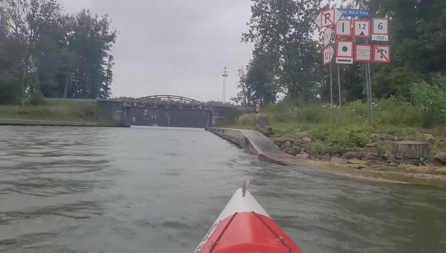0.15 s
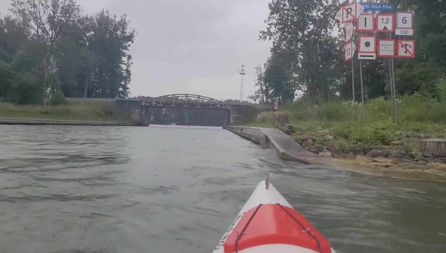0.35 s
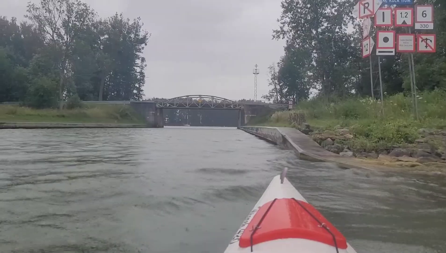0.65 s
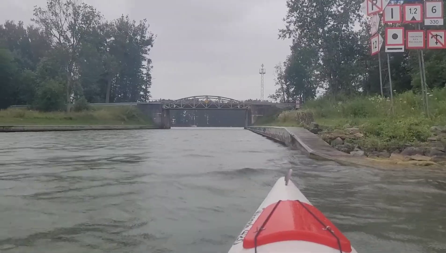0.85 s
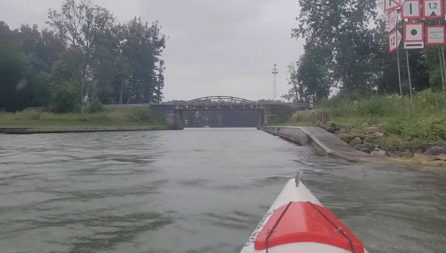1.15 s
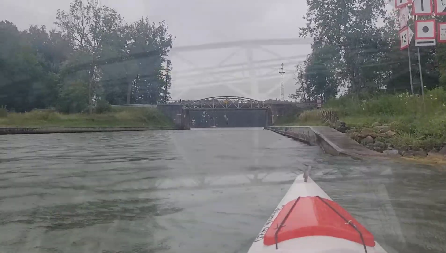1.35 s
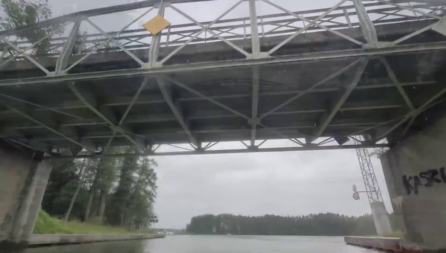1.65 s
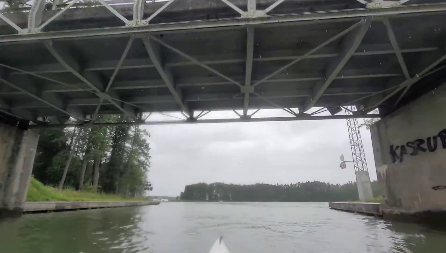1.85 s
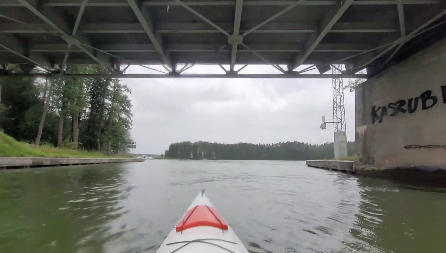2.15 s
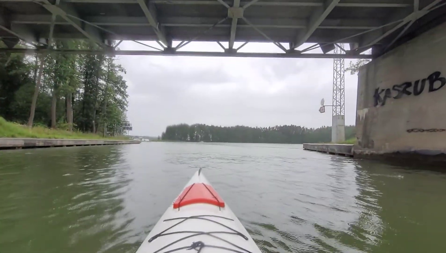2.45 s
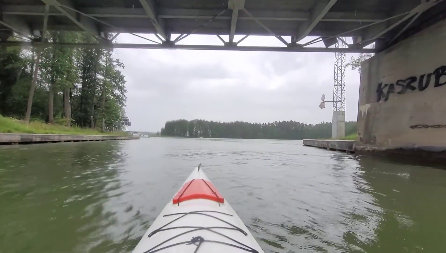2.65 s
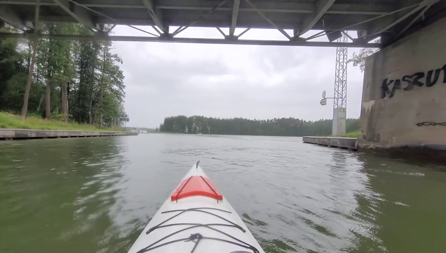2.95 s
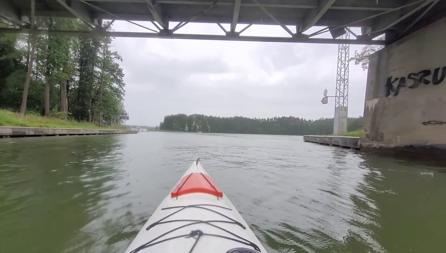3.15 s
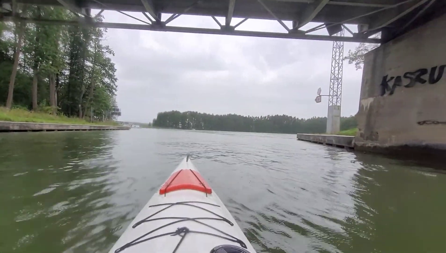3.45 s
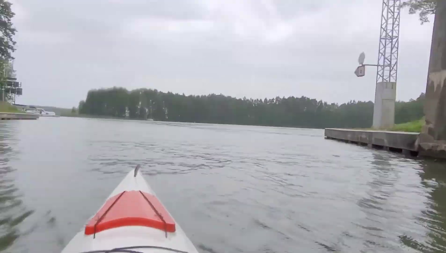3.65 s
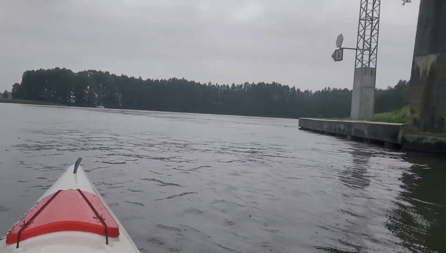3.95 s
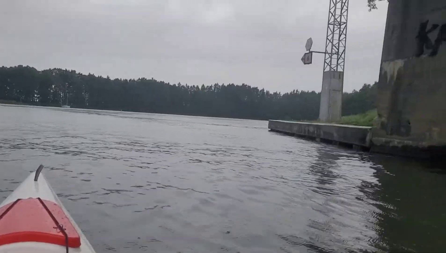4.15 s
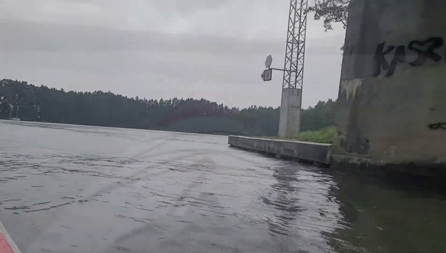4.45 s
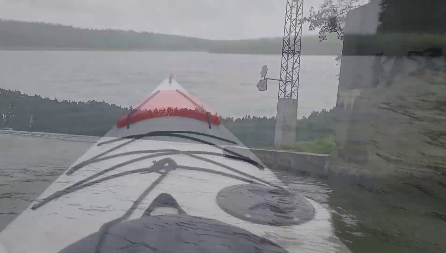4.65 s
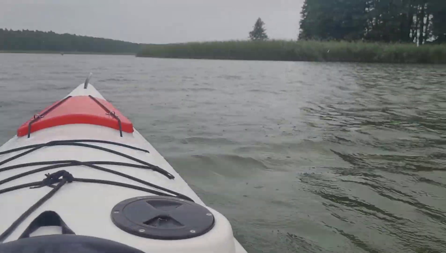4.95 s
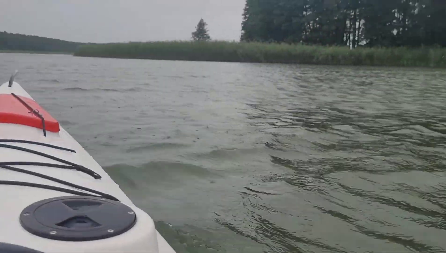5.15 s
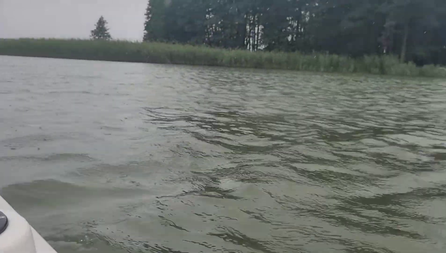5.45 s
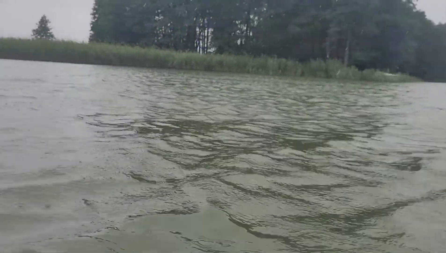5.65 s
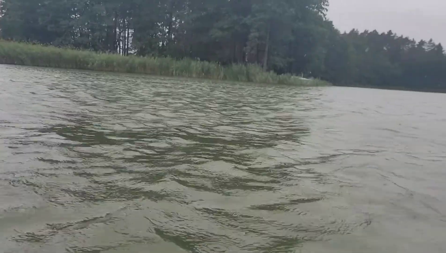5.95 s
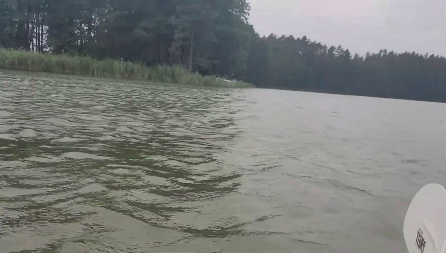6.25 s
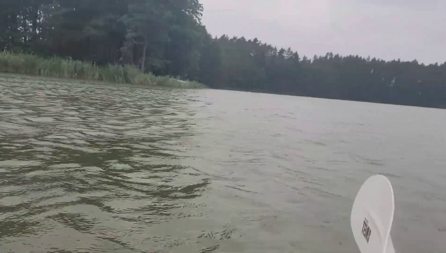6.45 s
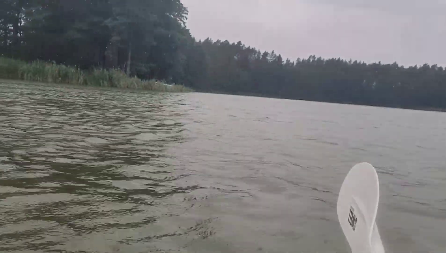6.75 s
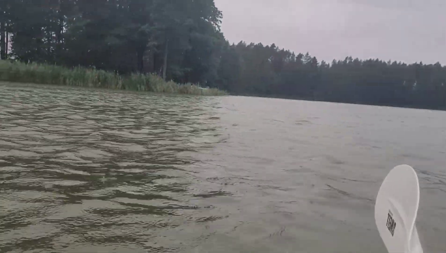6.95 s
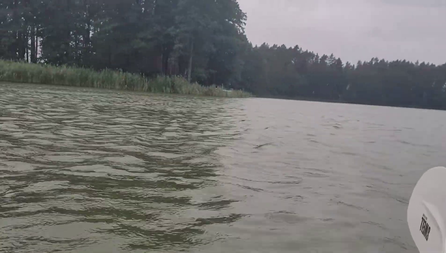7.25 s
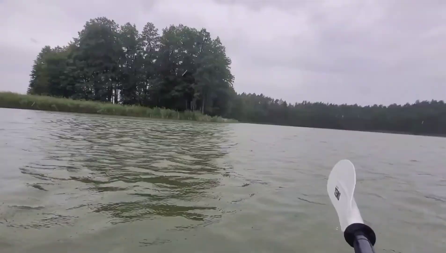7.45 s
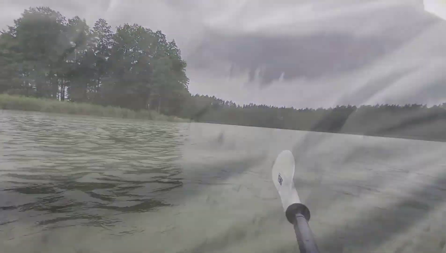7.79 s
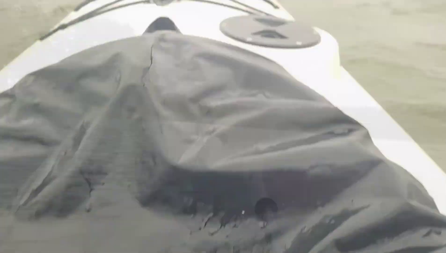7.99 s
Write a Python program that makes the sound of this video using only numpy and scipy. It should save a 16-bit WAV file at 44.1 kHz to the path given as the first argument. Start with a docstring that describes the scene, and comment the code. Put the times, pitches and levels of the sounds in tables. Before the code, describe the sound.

Rain patters and taps on a kayak over soft water hiss, with heavy low thumps near the microphone and a brief dropout late.

```python
"""Rain on a kayak

Rain falls on a kayak on a lake, heard by a small two-port microphone on board. Shaped noise makes the soft
wash; noise bursts ringing broad resonances make the patter, the near drops and the slaps on a hollow panel.
Large drops thump the ports as sliding, fading swings; wet cloth rustles as crackling noise, and trapped air
gurgles as noise ringing on a sliding pitch. Near 7.3 s all of it sinks almost to silence, then returns."""
import sys
import numpy as np
from scipy import signal
from scipy.fft import rfft, irfft
from scipy.io import wavfile
from scipy.ndimage import uniform_filter1d

SR = 44100
rng = np.random.default_rng(int(sys.argv[2]) if len(sys.argv) > 2 else 0)


def output_pcm(signal):
    """Save a mono or channel-first signal as 16-bit PCM at the path in sys.argv[1].

    Samples are clipped to [-1, 1] before scaling.
    """
    pcm = np.clip(np.atleast_2d(signal).T, -1, 1) * 32767
    wavfile.write(sys.argv[1], SR, np.round(pcm).astype(np.int16))


N = 358091  # length in samples

# Levels below are those before the overall gain and the microphone; sides are left over right.
# Wash of far rain and lake: (t/s, level/dB, rumble/dB, fizz/dB)
WASH_LEVELS = [(0.0, -52.5, -57, -60.5), (0.361, -50.5, -56.5, -57.5), (0.7, -44, -47, -52.5),
               (1.1, -44.5, -46.5, -54), (1.3, -53, -49, -62), (1.45, -59.5, -55, -66.5),
               (1.58, -65, -66, -72), (1.72, -58.5, -60, -68.5), (2.0, -55, -61, -60),
               (2.3, -56.5, -62, -61), (2.55, -50.5, -59.5, -54.5), (3.0, -55, -63, -58),
               (3.3, -51.5, -44.5, -56), (3.55, -63, -63.5, -63.5), (3.85, -55, -66, -58),
               (4.07, -59.5, -65, -64), (4.5, -53.5, -72, -59), (5.1, -58.5, -58.5, -63.5),
               (5.45, -50.5, -55.5, -59.5), (5.75, -50.5, -61, -59), (6.0, -56, -58.5, -58),
               (6.7, -56.5, -53.5, -60), (7.06, -52.5, -50, -62.5), (7.2, -53.5, -36, -67.5),
               (7.749, -64.5, -53.5, -64), (8.12, -65, -56, -68.5)]
# Resting colour of the wash, of which only the shape counts: (f/Hz, level/dB per Hz)
WASH_COLOUR = [(18, -59), (35, -18.5), (60, -9.5), (175, -10.5), (250, -5), (400, -12.5), (635, -10),
               (1120, -9), (2500, -18.5), (4860, -27), (6670, -36.5), (8670, -50.5), (12000, -45.5)]
# How alike the wash is at the two ports: (f/Hz, likeness 0-1)
PORT_LIKENESS = [(60, 0.14), (280, 0.51), (700, 0.57), (2800, 0.28), (6000, 0.4)]
# Parts of the wash, in the order level, rumble, fizz, hum: (lowest f/Hz, highest f/Hz)
WASH_BANDS = [(500, 2000), (40, 130), (2200, 6500), (150, 450)]
# Near drops: (t/s, peak/dB before the sides are shared, knock over snap/dB, tap over snap/dB, side/dB)
NEAR_DROPS = [(0.361, -33, 3, 9, 2.5), (0.532, -30.5, 13, 15, -5), (0.863, -19, 11.5, -5, -3),
              (0.981, -21.5, 28, 9, -13), (1.031, -18.5, 13, -8, 3.5), (1.238, -12, 6, 2, 9.5),
              (1.253, -23, 6, 0.5, -24), (1.321, -21.5, 17, 14.5, -6.5), (1.743, -36, -7, 2, -1),
              (1.83, -27, 24.5, 14.5, -17), (1.847, -8.5, 21.5, 17, -17), (1.873, -36.5, 39.5, 32, -8.5),
              (1.88, -27, 41, 24, -14), (1.965, -20, -10.5, -5, -3), (1.993, -27.5, 18, 13, -16),
              (2.034, -26, 14.5, 18.5, -17), (2.05, -20, 16.5, 16, -12), (2.049, -16.5, 22, 10, -17.5),
              (2.069, -27.5, 2.5, 10.5, -9.5), (2.122, -34.5, -5, 4, 4), (2.346, -31, 9, 4, 2),
              (2.437, -28, -6, -6, -2), (2.495, -36, -3.5, 19, -1), (2.544, -15.5, -5.5, 8, 2),
              (2.666, -24.5, 9, 16, -5), (2.914, -20, -5.5, -4.5, -9), (3.046, -33, 0, 15, -2),
              (3.172, -25, 6, 5, -2), (3.206, -25.5, 7, 4, 5), (3.316, -10, 9, 4, -3),
              (3.4, -30.5, -13, -12, -6), (3.414, -27.5, -15, -5, -5), (3.477, -25, -22, -10, -4),
              (3.491, -18, 2.5, -8, 8.5), (3.583, -34, -12, -5, 1), (3.873, -35, -24, -6, -2.5),
              (3.921, -27, -7, 2, 3), (4.169, -32, 11.5, 10.5, 3), (4.251, -30.5, 20, 17.5, -10),
              (4.449, -32, 24, 18, -16), (4.483, -31, 16, 15.5, -10), (4.58, -32.5, -15, -8, 16),
              (4.626, -22.5, -4.5, -6, 24), (4.649, -32, -21, -6, 19), (4.836, -21, -26, -17, 21),
              (4.906, -17.5, -12, -10.5, 11), (5.054, -11.5, -12.5, -16.5, 19.5), (5.128, -32, -7, -9, 11),
              (5.191, -32.5, -7, 1, 12), (5.218, -32.5, 6, -10, 21), (5.262, -18.5, -8.5, -19, 27),
              (5.298, -26.5, -6, -10, 27), (5.328, -25, -7, 1, 24), (5.353, -21.5, -16, -11, 32),
              (5.408, -29.5, -15.5, -7, 23), (5.435, -19.5, -8.5, -10, 20), (5.48, -13, -7.5, -5.5, 15),
              (5.592, -28, -5, -16, 20), (5.668, -15.5, -18, -10.5, 17), (5.727, -33, 0, 16, -18),
              (5.779, -21, -2, -21, 24.5), (5.818, -7, -1, -0.5, 24.5), (5.85, -9.5, -9.5, -15, 22),
              (5.901, -26.5, -17, -17, 29), (5.916, -21.5, -2.5, -17, 29), (5.945, -25, -10, -15, 27),
              (6.038, -24.5, -18, -19, 33), (6.086, -23.5, -10.5, -10.5, 30),
              (6.166, -23.5, -18.5, -17, 27), (6.213, -13, -0.5, -9, 37), (6.25, -32, -13, -13, 25),
              (6.265, -26, -11.5, -18, 24.5), (6.284, -29.5, 3, 4, 10), (6.301, -30, -11, -13, 24),
              (6.315, -20.5, -13, -22, 38), (6.358, -16, -23, -34, 35), (6.399, -31, 1, -1, 14),
              (6.423, -30, -11, -9, 25), (6.463, -23, 2, -6, 27), (6.487, -17, -4.5, -23, 28),
              (6.561, -24.5, -20, -26, 30), (6.631, -32.5, -7, -11, 17.5), (6.711, -34.5, -11, -21, 21),
              (6.752, -29.5, -22, -23, 29), (6.779, -25, 10, 10.5, 21), (6.806, -22, -3.5, -11, 25),
              (6.97, -32.5, -7, -23, 21), (7.048, -29, -1, 20, 5), (7.082, -21, 33, 12, -5.5),
              (7.111, -26, 6.5, 4.5, 15), (7.125, -13.5, 6, 9.5, -27), (7.148, -27, 8.5, 4.5, 13),
              (7.201, -11, 16, 14, -11.5), (7.637, -35, 15, 6.5, -28)]
# What a near drop rings, in the groups knock, tap, snap: (f/Hz, width of one resonance/Hz, level/dB)
DROP_BODY = [
    [(285, 170, 4.5), (430, 460, 8.5), (684, 430, -3)],
    [(1150, 900, 7), (2090, 1050, 3)],
    [(2800, 2300, 2.5), (4770, 1400, -2.5), (5460, 6200, -25.5), (8260, 9000, -17)],
]
# Big drops slapping a hollow panel:
# (t/s, peak/dB before the sides are shared, knock over snap/dB, tap over snap/dB, side/dB, burst decay/s)
PANEL_SLAPS = [(6.669, -9.5, 2, 10.1, -23.5, 0.002), (7.664, -18, 11.5, 11.3, -21, 0.0071),
               (7.687, -12, 23.5, 17.2, -22, 0.0072), (7.712, -13, 23, 17, -21.5, 0.0037)]
# What the panel rings, in the groups knock, tap, snap: (f/Hz, width of one resonance/Hz, level/dB)
PANEL_BODY = [
    [(601, 310, 0.0015)],
    [(1160, 660, 0.69), (1924, 450, 0)],
    [(2750, 1800, 0.5), (4100, 1100, -5.5), (6200, 1700, -22)],
]
# Wet cloth and splashing water, levels before the fade and the sides:
# (t/s, length/s, low level/dB, low f/Hz, hiss level/dB, hiss f/Hz, side/dB)
RUSTLES = [(0.711, 0.067, -44, 300, -42.5, 1170, -1), (1.856, .045, -25, 450, -44, 1160, -1),
           (1.993, .045, -31, 450, -35.5, 1250, -3), (2.041, 0.044, -29, 430, -31, 1200, 5.5),
           (2.653, 0.052, -35, 375, -38, 1360, 0), (3.164, 0.033, -32, 305, -42, 1900, 4),
           (4.44, 0.092, -41.5, 450, -49.5, 1020, -4.5), (5.777, 0.026, -36, 460, -43, 2430, 14.5),
           (5.824, 0.032, -30.5, 278, -38.5, 2300, 17.5), (6.167, 0.043, -44.5, 400, -41, 2450, 23),
           (6.668, 0.019, -46, 518, -36, 1700, -24), (7.085, 0.036, -30.5, 305, -50, 1750, 5),
           (7.119, 0.036, -21, 273, -40, 1470, -5.5)]
# Gurgles and plips of trapped air, pitch sliding from the start of an unheard lead-in:
# (t/s, length/s, level/dB before the soft ends and the sides, lead-in f/Hz, last f/Hz, side/dB)
GURGLES = [(0.769, 0.055, -31, 233, 284, 0), (1.774, 0.0076, -50, 1760, 1780, 2),
           (4.405, 0.039, -49, 1030, 1210, -18), (4.412, .035, -57, 2160, 2000, -10),
           (4.441, 0.019, -39.5, 1020, 965, -19)]
# Water striking the ports:
# (t/s, peak/dB before the sides are shared, push 1 or pull -1, first f/Hz, time to fall 90 dB/s, side/dB)
PORT_THUMPS = [(1.227, -8, 1, 192, 0.023, 4), (1.2358, -11, 1, 150, 0.024, 32),
               (1.2395, -7.5, -1, 110, 0.1, 4), (1.32, -14.5, -1, 170, 0.11, -6),
               (1.349, -16.5, -1, 152, 0.051, 6), (3.128, -28, -1, 110, 0.11, -1),
               (3.171, -23.5, -1, 110, 0.14, 0), (3.2054, -2, -1, 182, 0.038, 2),
               (3.3152, -7.5, -1, 225, 0.072, -3.5), (3.339, -14, -1, 202, .05, 11.5),
               (3.346, -3.5, -1, 111, 0.067, 0), (5.82, -15.5, -1, 351, 0.01, 30.5),
               (5.83, -35.5, 1, 198.6, 0.084, 22), (6.671, -34.5, 1, 100, 0.091, -14),
               (7.082, -7, 1, 130, 0.067, -7), (7.109, -16.5, -1, 150, 0.04, 9),
               (7.139, -4.5, -1, 130, 0.085, 3.5), (7.2011, -12, -1, 220, 0.073, -3),
               (7.264, -12.5, -1, 110, 0.091, 1)]
# Pitch where the ring of each port settles, left then right: (f/Hz)
PORT_HZ = [50.2, 43]
# Overall gain, with a short near-silence; the end values hold outside it: (t/s, gain/dB)
OVERALL_GAIN = [(7.291, 4), (7.328, -3), (7.337, -92.5), (7.486, -89), (7.495, -18), (7.56, -8.5),
                (7.64, 2.5)]

HUM_DB = 2  # the hull hums along with the wash, this far above its level
PATTER_DB, PATTER_PER_S, PATTER_KINDS = -19, 380, 24  # small random drops, level relative to the wash
# a near drop's burst lasts longer the stronger its tap is over its snap, with some chance
BURST_S, SLOWER_PER_DB, BURST_SCATTER = 0.0011, 0.08, 0.33
RUSTLE_FADE_DB = -16.5  # fall over the length of a rustle
PORT_LAG_S = 0.00095  # the port farther from the blow feels it this much later
DULL_HZ, EDGE_HZ = 6200, 16000  # where the wet microphone dulls, and the final band limit


def gain_of(db):
    """Turns decibels into a plain factor."""
    return 10 ** (np.asarray(db) / 20)


def evened(x):
    """Scales a sound to an average (rms) strength of 1."""
    return x / np.sqrt(np.mean(x ** 2) + 1e-20)


def read(points, hz):
    """Reads a curve between its points, along a logarithmic frequency scale."""
    f, value = np.transpose(points)
    return np.interp(np.log(hz + 1), np.log(f + 1), value)


def add(mix, s, sound, side_db):
    """Mixes a sound in at time s, shared between the ports."""
    ratio = gain_of(side_db)
    shares = np.array([[ratio], [1]]) * 2 / (1 + ratio)
    part = mix[:, round(s * SR):][:, :sound.shape[-1]]
    part += (sound * shares)[:, :part.shape[1]]


def resonate(x, hz, width):
    """A resonance of gain about 1 that follows the pitch curve hz."""
    turn = np.exp(2j * np.pi * np.cumsum(hz) / SR)
    r = np.exp(-np.pi * width / SR)
    # shift the pitch down to zero, smooth there, then shift it back
    return 2 * (turn * signal.lfilter([1 - r], [1, -r], x / turn)).real


def causal(gain):
    """The response with this gain that starts at once and then rings out (minimum phase)."""
    folded = irfft(np.log(gain + 1e-6))
    half = len(folded) // 2
    folded[1:half] *= 2
    folded[half + 1:] = 0
    return np.exp(rfft(folded))


def wash_curves(t):
    """Level, rumble, fizz and hum of the wash at times t, in dB."""
    s, *columns = np.transpose(WASH_LEVELS)
    level, rumble, fizz = (np.interp(t, s, column) for column in columns)
    return level, rumble, fizz, level + HUM_DB


def wash():
    """Far rain blurs into noise with patches and flicker; its level, rumble and fizz swell on their own."""
    hop, size = 256, 1024
    frames, hz = N // hop + 5, np.fft.rfftfreq(size, 1 / SR)
    a, b, c, d, patches = rng.standard_normal((frames, len(hz), 5)).T
    patches = uniform_filter1d(patches, 14, 0)  # across frequency
    patches = evened(uniform_filter1d(patches, 10, 1))  # across time
    flicker = evened(uniform_filter1d(rng.standard_normal(frames), 4))
    colour = read(WASH_COLOUR, hz)

    # lift of each band over the resting colour, blended smoothly across frequency
    lifts, shares = [], []
    for db, (lo, hi) in zip(wash_curves(np.arange(frames) * hop / SR), WASH_BANDS):
        resting_power = (gain_of(colour[(hz > lo) & (hz < hi)]) ** 2).sum()
        lifts.append(db - 10 * np.log10(resting_power))
        distance = np.log((hz + 1) / np.sqrt(lo * hi)) / 0.5
        shares.append(np.exp(-distance ** 2 / 2) + 1e-30)
    shares = np.array(shares)
    lift = (shares / shares.sum(0)).T @ np.array(lifts)
    field_db = colour[:, None] + lift + 0.57 * patches + 1.7 * flicker

    same = np.clip(read(PORT_LIKENESS, hz), 0, 1)[:, None]
    left = a + 1j * b
    right = same * left + np.sqrt(1 - same ** 2) * (c + 1j * d)
    spectra = np.array([left, right]) * gain_of(field_db)
    return signal.istft(spectra, nperseg=size, noverlap=size - hop)[1][:, :N]


def drop(knock_db, tap_db, spread, chance, body=DROP_BODY, rise=0.0015):
    """A drop's short burst rings broad modes; each port hears its own mix of private and shared noise."""
    t, hz = np.arange(2048) / SR - 0.0025, np.fft.rfftfreq(4096, 1 / SR)  # impact at t = 0
    shape = np.exp(np.where(t < 0, t / rise, -t / max(spread, 0.0003)))
    spray = gain_of(-23.5 - 60 * t / 0.084) * (t > 0)  # fine splash that follows
    burst = (chance[:2] + 0.39 * chance[2]) * (shape + spray)
    burst[:, round(0.0025 * SR)] -= 8.0  # the impact itself

    power = 0
    for lift_db, group in zip((knock_db, tap_db, 0), body):
        for f, width, db in group:
            mode = abs(hz * width / (f ** 2 - hz ** 2 + 1j * hz * width))
            power = power + gain_of(lift_db + db) ** 2 / width * mode ** 4
    response = causal(np.sqrt(power / power.max()))
    sound = irfft(rfft(burst, 4096) * response)[:, :2600]
    return sound / abs(sound).max(1, keepdims=True)


def patter():
    """Many small drops of random size, colour and side, following the level of the wash."""
    out = np.zeros((2, N))
    for knock, tap, side in rng.random((PATTER_KINDS, 3)):
        hits = rng.random(N) < PATTER_PER_S / PATTER_KINDS / SR
        sizes = hits * gain_of(5.0 * np.minimum(rng.exponential(1, N), 3))
        tick = drop(-8 + 12 * knock, -8 + 12 * tap, 0.0034, rng.standard_normal((3, 2048)))
        add(out, 0, signal.oaconvolve(sizes[None], tick)[:, :N], 24 * (side - 0.5))
    return evened(out) * gain_of(PATTER_DB + wash_curves(np.arange(N) / SR)[0])


def drops():
    """Each near drop rings what it hits, and each slap rings the hollow panel, at its own moment."""
    out = np.zeros((2, N))
    for s, db, knock_db, tap_db, side_db in NEAR_DROPS:
        burst_s = BURST_S * np.exp(SLOWER_PER_DB * tap_db + BURST_SCATTER * rng.standard_normal())
        sound = drop(knock_db, tap_db, burst_s, rng.standard_normal((3, 2048)))
        add(out, s - 0.0008, gain_of(db) * sound, side_db)
    for s, db, knock_db, tap_db, side_db, burst_s in PANEL_SLAPS:
        chance = rng.standard_normal((3, 2048))
        sound = drop(knock_db, tap_db, burst_s, chance, PANEL_BODY, rise=0.00068)
        add(out, s - 0.002, gain_of(db) * sound, side_db)
    return out


def rustles():
    """Clumped grains ring a low resonance and a broad crackling hiss; each starts fast and fades."""
    out = np.zeros((2, N))
    for s, length, low_db, low_hz, hiss_db, hiss_hz, side_db in RUSTLES:
        count = round(length * SR)
        along = np.linspace(0, 1, count)
        noise = rng.standard_normal((3, count))
        noise = noise[:2] + 0.99 * noise[2]  # partly unlike at the two ports
        pops = (rng.random(count) < 400 / SR) * 6  # about 400 a second
        low_curve, hiss_curve = np.full(count, low_hz), np.full(count, hiss_hz)
        low = resonate(resonate(noise * (0.2 + pops), low_curve, 160), low_curve, 700)
        clumps = 0.77 + signal.lfilter([1], [1, -0.985], pops) / 6  # each pop dies away
        hiss = resonate(resonate(noise * clumps, hiss_curve, 1500), hiss_curve, 2000)
        sound = gain_of(low_db) * evened(low) + gain_of(hiss_db) * evened(hiss)
        fade = gain_of(RUSTLE_FADE_DB * along) * signal.windows.tukey(count, 0.2)
        add(out, s, sound * fade, side_db)
    return out


def gurgles():
    """A pocket of air, shaken by lapping water, rings roughly on a sliding pitch."""
    out = np.zeros((2, N))
    lead_in = 800  # samples in which the ring builds up unheard
    for s, length, db, first_hz, last_hz, side_db in GURGLES:
        count = round(length * SR)
        hz = np.linspace(first_hz, last_hz, count + lead_in)
        ring = resonate(rng.standard_normal(len(hz)), hz, 0.16 * first_hz)
        ring = resonate(ring, hz, 0.33 * first_hz)[lead_in:]
        add(out, s, gain_of(db) * evened(ring) * signal.windows.tukey(count, 0.5), side_db)
    return out


def thumps():
    """A slug of water shoves the membrane; the swing slides from its first pitch to the port's low ring."""
    out = np.zeros((2, N))
    last_hz = np.array(PORT_HZ)[:, None]
    for s, db, way, first_hz, fall_s, side_db in PORT_THUMPS:
        farther = np.array([[side_db < 0], [side_db >= 0]])
        t = np.maximum(np.arange(7000) / SR - PORT_LAG_S * farther, 0)
        settle = 0.83 / first_hz  # a sharper blow settles sooner
        turns = last_hz * t + (first_hz - last_hz) * settle * (1 - np.exp(-t / settle))
        decay = gain_of(-30 * t / fall_s - 60 * (t / fall_s) ** 2)
        onset = 1 - np.exp(-(t / 0.0013) ** 2)
        swing = np.sin(2 * np.pi * turns) * decay * onset
        add(out, s - PORT_LAG_S / 2, np.sign(way) * gain_of(db) * swing / abs(swing).max(), side_db)
    return out


def scene():
    """All the sounds together, under the overall gain."""
    gain = gain_of(np.interp(np.arange(N) / SR, *np.transpose(OVERALL_GAIN)))
    return gain * (wash() + patter() + drops() + rustles() + gurgles() + thumps())


def record(dry):
    """The wet microphone dulls the treble, the input clips and adds a small offset; then the band limit."""
    dull = signal.sosfilt(signal.butter(6, DULL_HZ, fs=SR, output="sos"), dry)
    clipped = np.clip(dull, -1, 1) + 0.0013
    band_limit = signal.firwin(511, EDGE_HZ, window=("kaiser", 9), fs=SR)
    return signal.oaconvolve(clipped, band_limit[None], "same")


dry = scene()
out = record(dry)
output_pcm(out)
```